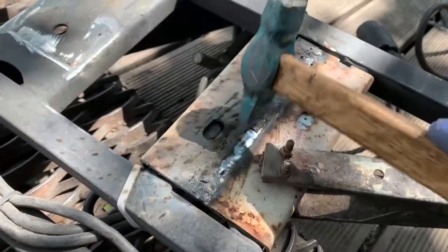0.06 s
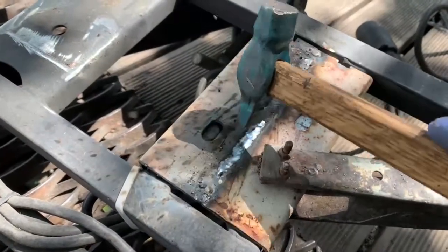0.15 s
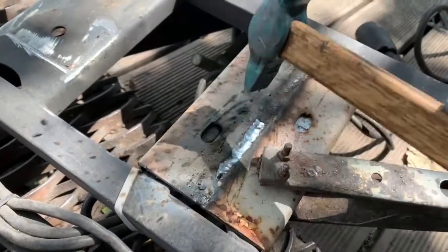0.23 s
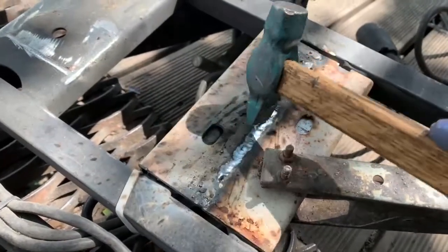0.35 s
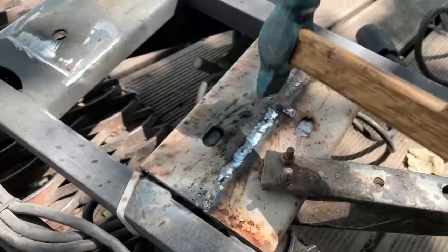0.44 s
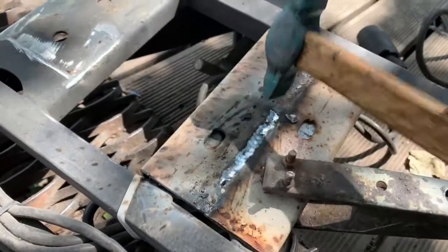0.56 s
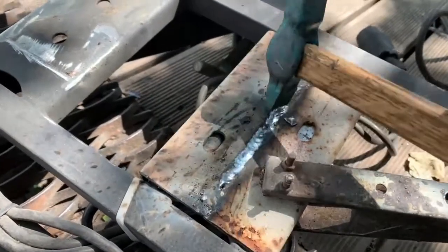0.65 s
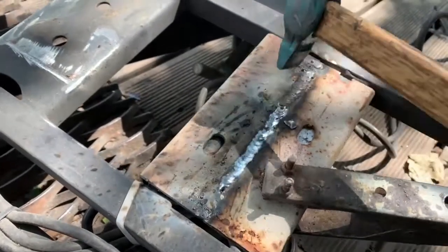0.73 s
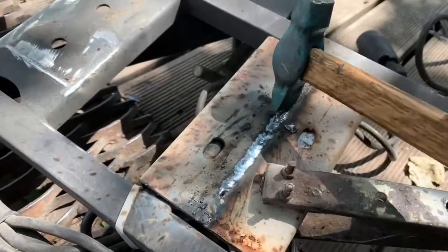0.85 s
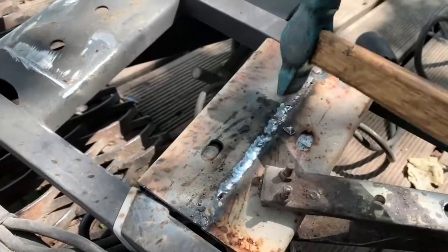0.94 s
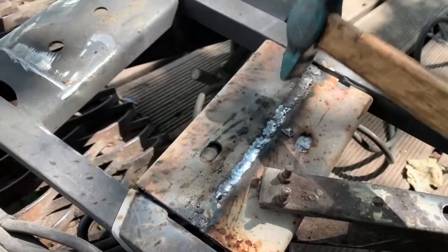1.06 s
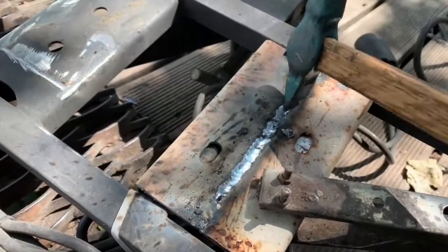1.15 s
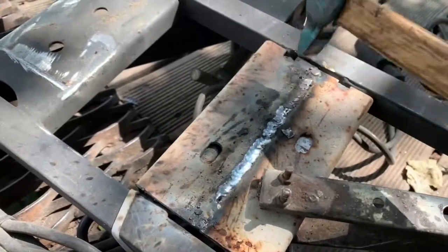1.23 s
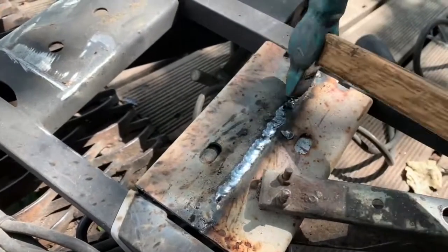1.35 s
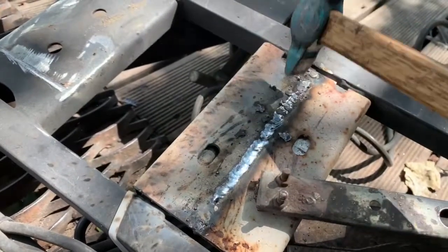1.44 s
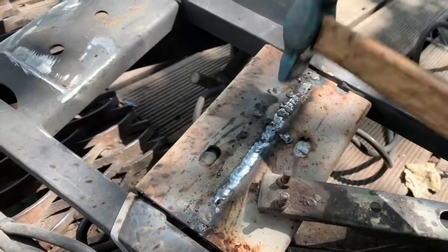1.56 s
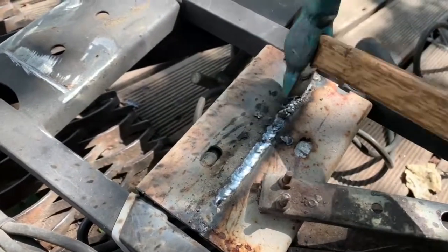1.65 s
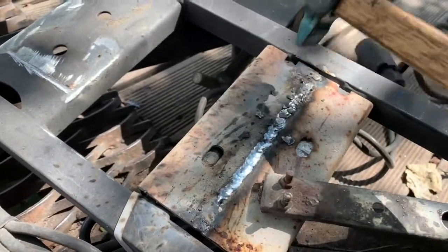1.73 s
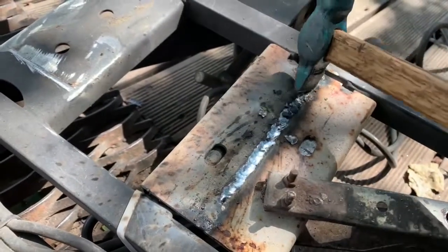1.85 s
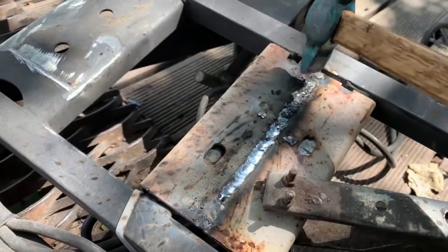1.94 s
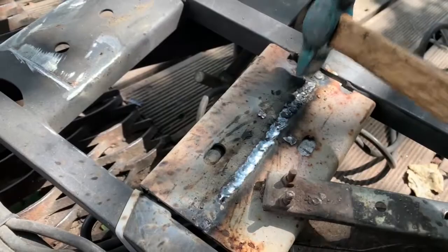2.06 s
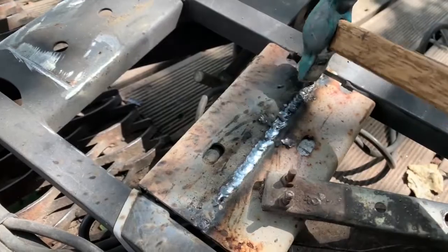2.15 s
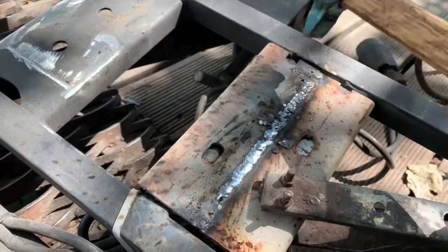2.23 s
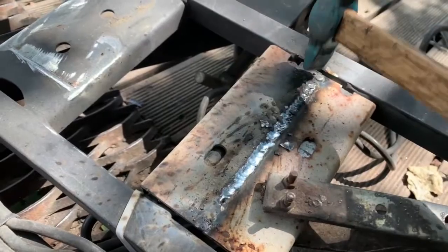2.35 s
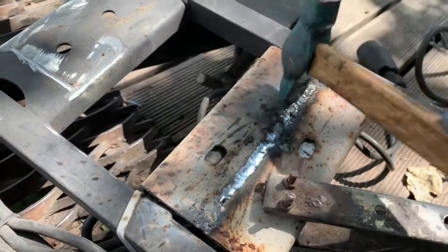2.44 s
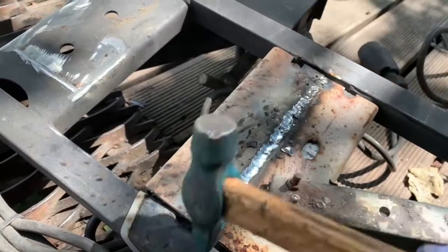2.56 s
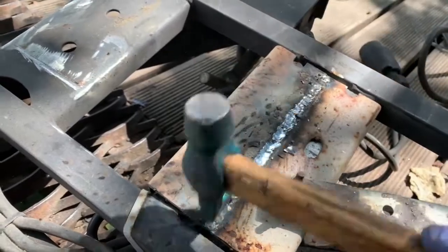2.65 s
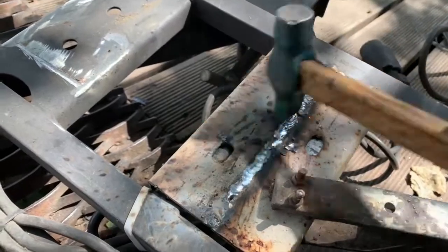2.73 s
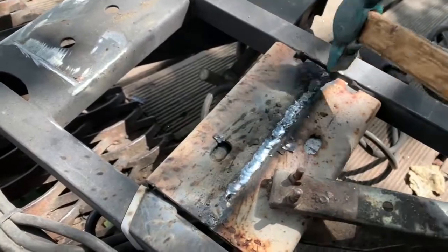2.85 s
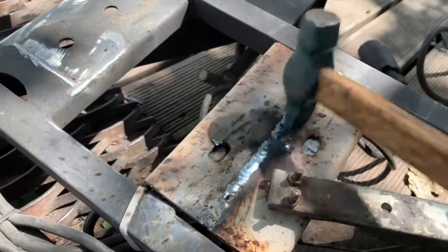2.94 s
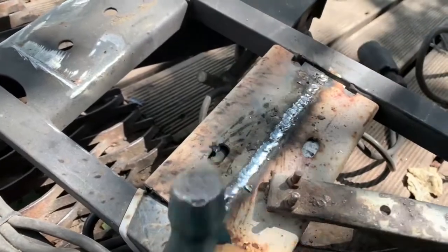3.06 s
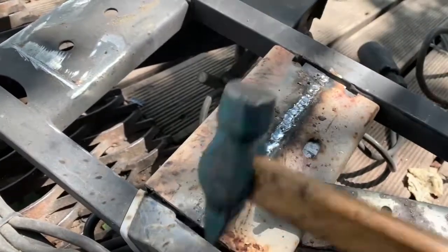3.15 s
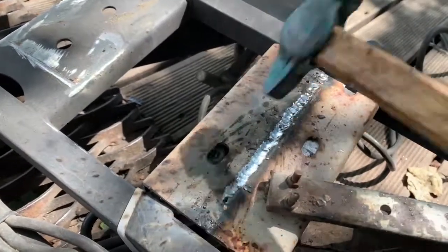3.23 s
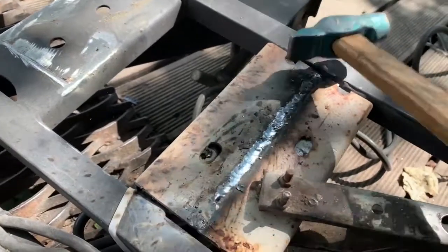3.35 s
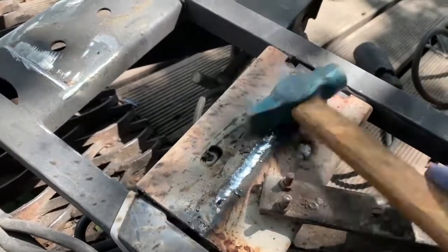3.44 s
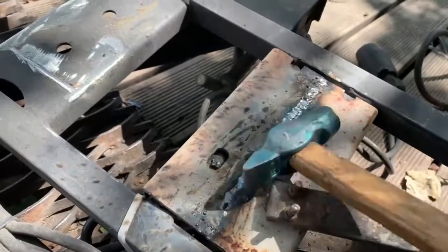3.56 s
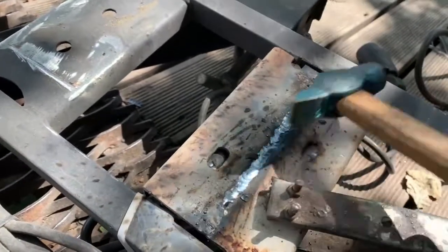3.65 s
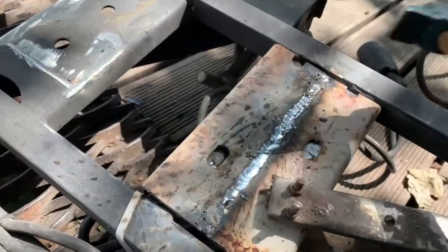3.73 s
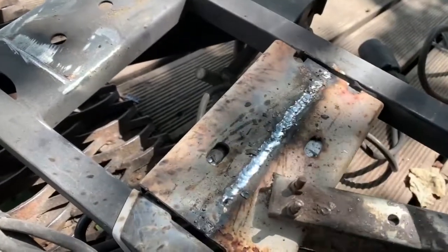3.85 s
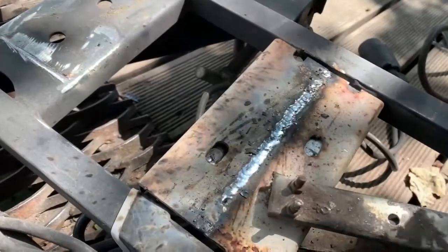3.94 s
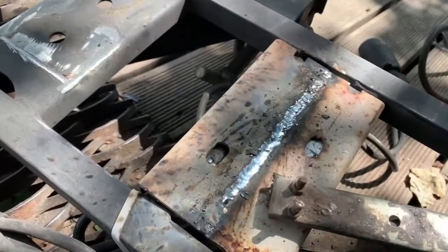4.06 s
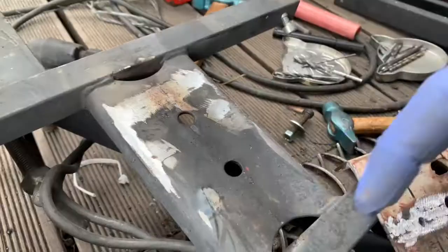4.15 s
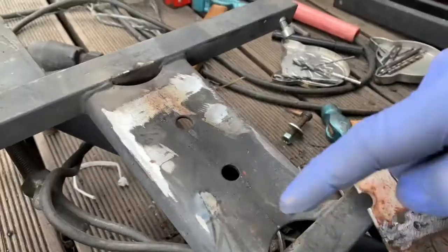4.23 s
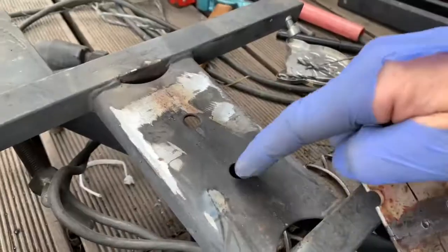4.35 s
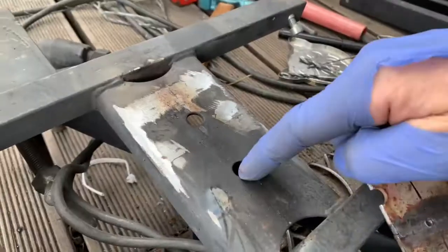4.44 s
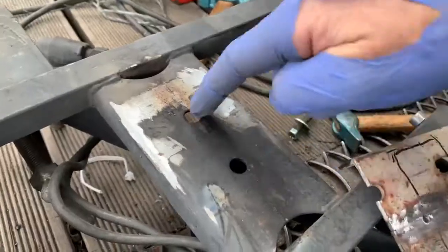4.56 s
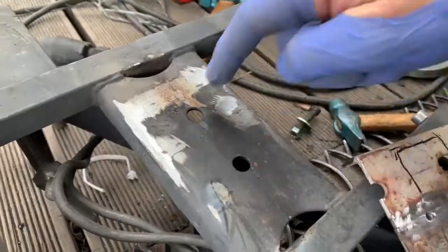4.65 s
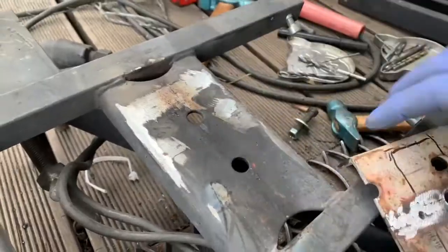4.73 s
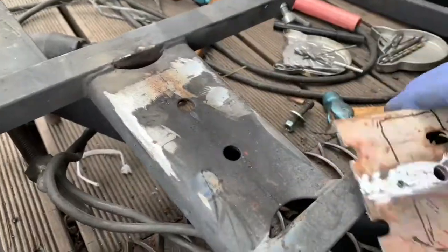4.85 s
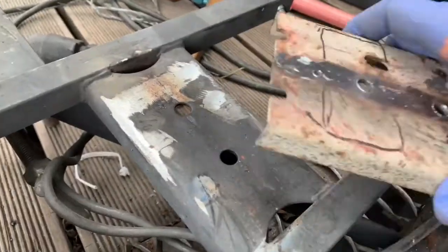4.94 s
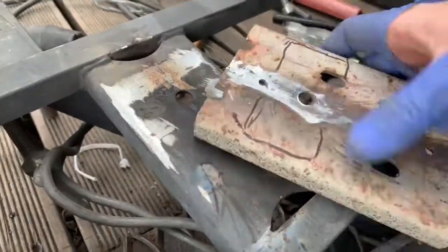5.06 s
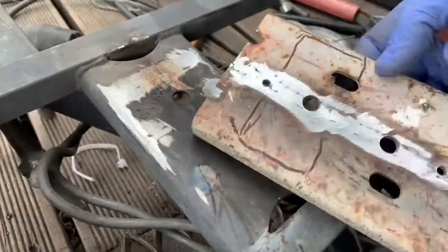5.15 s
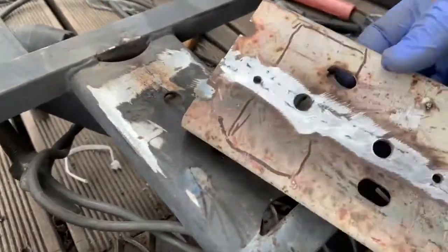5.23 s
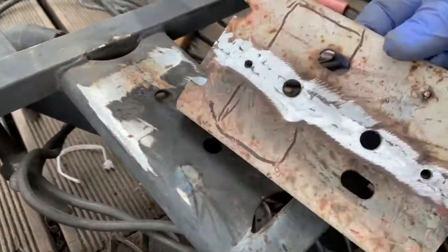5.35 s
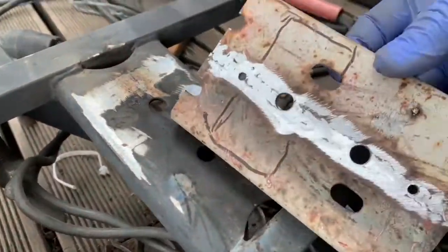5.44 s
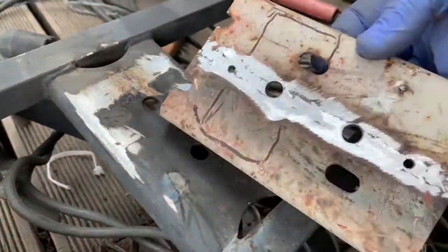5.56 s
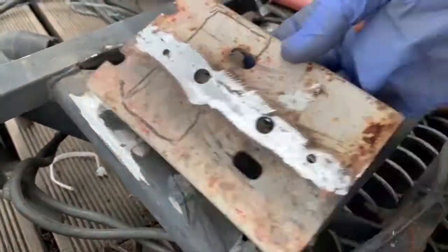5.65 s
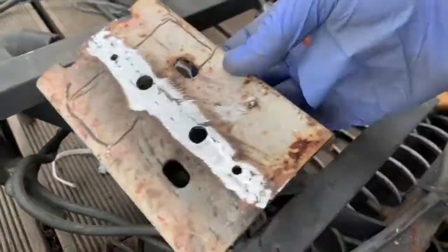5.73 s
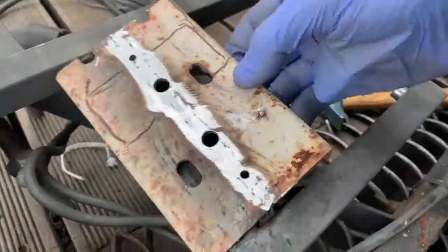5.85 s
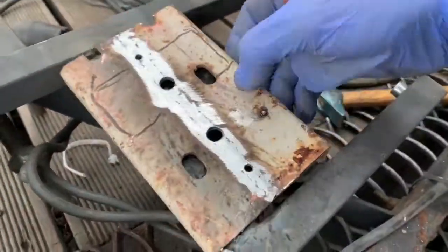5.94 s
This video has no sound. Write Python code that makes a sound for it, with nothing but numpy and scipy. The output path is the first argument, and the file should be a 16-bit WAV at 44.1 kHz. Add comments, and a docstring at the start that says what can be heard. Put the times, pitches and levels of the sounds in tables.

```python
"""An outdoor work yard, with far traffic rumbling. A small hammer chips slag off a weld on a steel plate
clamped to a frame, then rakes along the seam. Each impact crunches the brittle slag, a broadband noise,
and excites the damped normal modes of plate and frame; crumbs patter down. Then the scene changes to
yard noise with thinner bass: a loose plate is lifted and clinks while a distant motor drones nearer."""
import sys
import numpy as np
from scipy import signal
from scipy.fft import rfft, irfft, next_fast_len
from scipy.io import wavfile

SR = 44100
rng = np.random.default_rng(int(sys.argv[2]) if len(sys.argv) > 2 else 0)


def to_wav(sig):
    """Store sig (one row per channel, or 1-D mono) as 16-bit WAV at the path in sys.argv[1].

    Samples outside -1..1 are clipped; the rate is SR.
    """
    pcm = np.clip(np.atleast_2d(sig), -1, 1) * 32767
    pcm = np.round(pcm).astype(np.int16)
    wavfile.write(sys.argv[1], SR, pcm.T)  # frames by channels


N = 264600
TIME = np.arange(N) / SR
BAND_EDGES_HZ = 25 * 2 ** np.arange(0, 9.5, 1 / 3)
SCENE_CHANGE_S = 4.165

# Background noise spectra: frequency_hz, relative_density_db
TRAFFIC_SPECTRUM = [(18, -31.5), (38, -14), (56, 1.5), (91, -5), (467, -18.5), (592, -21), (1180, -23.5),
                    (2220, -31.5), (2530, -30), (3760, -36), (13000, -49), (16500, -75.5)]
YARD_SPECTRUM = [(24, -86), (40, -44), (156, -4.5), (168, 2), (191, -18.5), (228, -36), (285, -2),
                 (406, -15.5), (725, -13.5), (1200, -21.5), (3050, -20), (7940, -36.5), (12800, -42),
                 (16500, -69)]
# Likeness of left and right: frequency_hz, correlation
BACKGROUND_COHERENCE = [(60, 0.95), (180, 0.9), (550, 0.61), (1650, 0.39), (4970, -0.2), (15000, -0.44)]
IMPACT_COHERENCE = [(300, 1), (1000, 1), (1900, 0.24), (5500, 0.4), (9000, 0.73), (14000, 1)]
# Motor resonances: pitch_hz, bandwidth_hz, relative_db
MOTOR_RESONANCES = [(193.1, 3.7, -0.5), (303.6, 58, -2), (682, 77, -9)]
# Soft finger taps: start_s, level_db
TAPS = [(4.409, -50), (4.466, -48)]
# Loose plate touching steel, with tone offsets: start_s, level_db, boom_db, knock_db, treble_db
CLINKS = [(5.009, -16, -9.5, -6, 2), (5.0593, -24.5, -6, -9, 0.5), (5.0968, -35.5, -5, 2, -6),
          (5.1043, -34, -0.5, -5, -10), (5.6785, -37.5, -5, -15, -10), (5.7712, -55.5, 11, 19, 11),
          (5.95, -44, 6.5, 7.5, 4)]
# Hammer blows, with tone offsets: start_s, level_db, boom_db, knock_db, treble_db, frame_ring_db
BLOWS = [(0.0923, -15, 6, 5, -5, -49), (0.3473, -21.5, 9, 1.5, 8.5, -37), (0.598, -9.5, 2, 0, -1, -37.5),
         (0.853, -14.5, 4, -0.5, 2, -40.5), (1.1098, -11, 3, -1, -1.5, -35),
         (1.3437, -7.5, 3, 4, 3.5, -38.5), (1.5999, -4, -0.5, 5, 0.5, -52),
         (1.8552, -8.5, -0.5, 5, -1, -42), (2.0895, -4, 0, 3.5, -0.5, -36),
         (2.3857, -10.5, 2.5, 3.1, 2.5, -48), (2.4285, -20, 6.5, 0.5, -19, -56),
         (2.4482, -29, 3, -5, 2.5, -54), (2.487, -27.5, -29, -29, 2, -52), (2.499, -29, 3, -24, 9, -38),
         (2.5372, -13, -2.5, 2.2, -6, -63), (2.584, -21, 10, 2.2, -9, -42),
         (2.7636, -22.5, 6, 2.5, 1.2, -53.5), (2.814, -15.5, -9.5, -3.5, -4.4, -33.5),
         (2.9205, -18.5, -0.1, 2, -24, -52), (3.029, -29, 11, 4.5, 6, -58),
         (3.4163, -5, -6.5, -1.5, -4.5, -33.5), (3.5159, -35, 13, 13, 4, -55),
         (3.5474, -21, 0, -11, -10.5, -30.5)]
# Where the tone offsets apply (the body's is zero): boom_hz, knock_hz, body_hz, treble_hz
CLINK_TONE_HZ = [900, 2200, 4500, 9500]
BLOW_TONE_HZ = [400, 1050, 3500, 9500]
# Impact noise spectra: frequency_hz, relative_density_db
CLINK_SPECTRUM = [(180, -47), (300, -48), (1290, -7.5), (2930, -5), (4240, -12.5), (4930, -41), (5360, 11),
                  (5830, -11.5), (14200, -18.5), (16500, -36)]
CRUNCH_SPECTRUM = [(59, -39), (100, -18), (410, -22), (589, -15), (811, -28), (983, -4.5), (1270, -12),
                   (1510, -14.5), (2460, -11), (4680, -8.5), (5430, -12), (10100, -16), (11700, -21.5),
                   (13600, -18), (16500, -49.5)]
# Decay of impact noise, before decay_scale: frequency_hz, crack_t60_s, clatter_t60_s
IMPACT_DECAY = [(148.9, 0.084, 0.53), (960, 0.015, 0.18), (4000, 0.022, 0.16), (9200, 0.032, 0.18),
                (15600, 0.022, 0.1)]
# Normal modes of the plates: pitch_hz, relative_db, t60_s
LOOSE_MODES = [(417, -2, 0.031), (946, -7, 0.075), (1810, -16, 0.093), (2330, -0.5, 0.042),
               (3060, -11, 0.057), (3470, -1.5, 0.035), (3730, -11, 0.011), (5006, -9, 0.12),
               (5800, 5, 0.03), (6029, -17, 0.18), (6340, -18, 0.034), (8640, -7, 0.017), (8700, -11, 0.1)]
CLAMPED_MODES = [(592, -13.5, 0.08), (1004.8, -1, 0.09), (1029, -13, 0.17), (951.6, -2, 0.051),
                 (1082, -4.5, 0.082), (1537, -10, 0.063), (2006, -8, 0.044), (2113, -23, 0.22),
                 (2360, -7.5, 0.02), (2840, -9, 0.19), (3229, 3, 0.035), (3450, -7.5, 0.07),
                 (4100, -2, 0.06), (4230, -6.5, 0.099), (4280, -15, 0.16), (4500, -29, 0.41),
                 (4444, -6.5, 0.017), (5910, -8, 0.067), (5980, -9, 0.13), (6570, -3.5, 0.086),
                 (6670, -15, .1), (6650, -10.5, 0.068), (8050, -15, 0.09), (9862, -18, 0.039)]
# Hammer edge dragged over the seam: start_s, fade_from_s, end_s, level_db
# The strokes swell and ease off; the third starts abruptly and only fades.
RAKE_STROKES = [(2.44, 2.49, 2.525, -15), (2.927, 2.978, 3.008, -23), (3.449, 3.435, 3.478, -12.5),
                (3.467, 3.469, 3.53, -19.5)]
# Spectrum of raking relative to blows: frequency_hz, gain_db
RAKE_COLOUR = [(300, -14), (1000, -5.5), (2200, 0), (4000, -0.5), (6000, 0), (12000, 7)]
# Short treble ticks, the dying patter of an earlier blow and then single flakes landing: start_s, level_db
SLAG_TICKS = [(0.002, -52.5), (0.0588, -52), (0.183, -61.5), (0.204, -63), (0.278, -72), (0.3134, -55.5),
              (0.74, -71.5), (0.817, -75), (0.98, -69), (1.0417, -66.5), (3.224, -66.5)]
# Phase difference between the channels: frequency_hz, left_lead_rad
CLINK_PHASE = [(0, -2), (2400, 0.8), (3000, 5), (4100, -2), (5500, -2.5), (6500, 2.3), (16200, -3.5)]
HAMMER_PHASE = [(0, 0), (690, 0.85), (1030, 1.18), (1400, 1.32), (1720, -0.7), (3270, -3), (4220, -6),
                (5430, -10.5), (6720, -11.5), (7670, -15), (8700, -16), (13700, -26), (16200, -35)]
# Level difference between the channels: frequency_hz, left_over_right_db
CLINK_BALANCE = [(60, -3), (180, -2.0), (550, 1.5), (1650, -5.5), (4970, 3.0), (15000, 3)]
HAMMER_BALANCE = [(60, -6), (130, -0.5), (290, 0.5), (640, 2), (1410, 3.5), (3100, 3), (6820, -1),
                  (15000, 1.5)]


def amp(db):
    """Amplitude grows tenfold for every 20 dB."""
    return 10 ** (np.asarray(db) / 20)


def unit_rms(x):
    """Normalisation to unit mean power."""
    return x / np.sqrt(np.mean(x ** 2) + 1e-20)


def at_hz(table, hz, column=1):
    """Interpolation on a logarithmic frequency axis."""
    table = np.array(table)
    return np.interp(np.log(hz), np.log(table[:, 0] + 1), table[:, column])


def high_pass(x, hz, order=2):
    """A high-pass filter attenuates the bass."""
    return signal.sosfilt(signal.butter(order, hz, "high", fs=SR, output="sos"), x)


def impulses(events, gains):
    """A brief contact acts as an impulse: one at each event's start."""
    out = np.full(N, 1e-18)
    out[(np.array(events)[:, 0] * SR).astype(int)] = gains
    return out


def decay(hits, t60):
    """Exponential decay: each impulse falls 60 dB in t60 seconds."""
    return signal.lfilter([1], [1, -amp(-60 / (t60 * SR))], hits)


def ring(force, hz, t60):
    """Damped oscillator: a unit impulse starts a decaying sine of height 1."""
    radius, angle = amp(-60 / (t60 * SR)), 2 * np.pi * hz / SR
    return signal.lfilter([0, np.sin(angle)], [1, -2 * radius * np.cos(angle), radius ** 2], force)


def grit(per_s, spread_db, t60):
    """Shot noise: tiny random contacts sum to an uneven envelope of unit rms."""
    sizes = amp(spread_db * np.minimum(rng.exponential(1, N), 4))
    contacts = rng.random(N) < per_s / SR
    return unit_rms(decay(sizes * contacts + 1e-18, t60))


def drift(rate_hz):
    """Low-passed noise fluctuates slowly, with unit rms."""
    step = 40
    pole = np.exp(-2 * np.pi * rate_hz * step / SR)
    slow = signal.lfilter([1], [1, -2 * pole, pole ** 2], rng.standard_normal(N // step + 2002))[2000:]
    return np.interp(np.arange(N) / step, np.arange(len(slow)), unit_rms(slow))


def noise_bands(coherence, lowest_hz=20):
    """Partial coherence: in-phase and antiphase noise mix to stereo in each third-octave band."""
    whites = rng.standard_normal((2, 2, N))   # neighbouring bands use independent noise
    edges = BAND_EDGES_HZ[BAND_EDGES_HZ > lowest_hz]
    for k, (low, high) in enumerate(zip(edges, edges[1:])):
        band = signal.butter(2, [low, high], "band", fs=SR, output="sos")
        mid, side = signal.sosfilt(band, whites[k % 2])
        hz = np.sqrt(low * high)
        alike = at_hz(coherence, hz)
        yield hz, np.sqrt(.5 + alike / 2) * mid + np.sqrt(.5 - alike / 2) * side * [[1], [-1]]


def ambient_noise(spectrum):
    """Random amplitude modulation makes each band of a broad noise gently patchy."""
    return sum(amp(at_hz(spectrum, hz) + 1.1 * drift(rate_hz=24)) * noise
               for hz, noise in noise_bands(BACKGROUND_COHERENCE))


def ramp(start_s, db, db_per_s):
    """Exponential gain: from its onset the level changes linearly in decibels."""
    return amp(db + db_per_s * (TIME - start_s)) * (TIME >= start_s)


def traffic(level_db=-55, fade_from_s=3.58, fade_db_per_s=5):
    """Far traffic is broadband noise with its power in the bass; it thins as the first scene ends."""
    gain = amp(level_db - fade_db_per_s * np.maximum(TIME - fade_from_s, 0)) * (TIME < SCENE_CHANGE_S)
    return gain * unit_rms(ambient_noise(TRAFFIC_SPECTRUM))


def yard():
    """The second scene's ambient noise, high-passed to a thinner bass, swells slowly."""
    noise = unit_rms(high_pass(ambient_noise(YARD_SPECTRUM), 75, order=4))
    return ramp(SCENE_CHANGE_S, db=-64.5, db_per_s=2) * noise


def resonant_noise(hz, width_hz):
    """A resonator driven by noise gives a wavering tone."""
    radius = np.exp(-np.pi * width_hz / SR)
    feedback = [1, -2 * radius * np.cos(2 * np.pi * hz / SR), radius ** 2]
    return unit_rms(signal.lfilter([1, 0, -1], feedback, rng.standard_normal(N)))


def motor(whine_end_s=4.6):
    """Narrow resonances drone and swell as the motor nears; a brief faint whine comes first."""
    drone = sum(amp(db) * resonant_noise(hz, width_hz) for hz, width_hz, db in MOTOR_RESONANCES)
    drone *= ramp(start_s=4.45, db=-72.5, db_per_s=9.5)
    whine = resonant_noise(hz=431, width_hz=6.02) * (TIME < whine_end_s)
    whine *= ramp(SCENE_CHANGE_S, db=-69, db_per_s=-15.5)
    return high_pass(drone + whine, 80, order=4)


def localise(x, phase, balance, scatter_db=-24.5, scatter_t60_s=0.041):
    """Phase and level differences place a near source; frame and deck add scattered reflections."""
    size = next_fast_len(N + 8192)
    hz = np.arange(size // 2 + 1) * SR / size
    left = np.exp(.5j * np.interp(hz, *np.transpose(phase))) * amp(at_hz(balance, hz + 1) / 2)
    direct = np.array([left, 1 / left])
    tail = amp(scatter_db - 60 * np.arange(4096) / (scatter_t60_s * SR))
    band = signal.butter(2, [1300, 6940], "band", fs=SR, output="sos")
    scatter = signal.sosfilt(band, tail * rng.standard_normal((2, 4096)))
    return irfft(rfft(x, size) * (direct + rfft(scatter, size)), size)[:, :N]


def impact_db(events, tone_hz, hz, spread_db):
    """Excitation spectrum: each impact's level at one frequency, with its tone offset and chance."""
    level_db, boom, knock, treble = np.transpose(events)[1:5]
    tones = np.transpose([boom, knock, np.zeros(len(events)), treble])
    offset_db = [np.interp(np.log(hz), np.log(tone_hz), tone) for tone in tones]
    return level_db + offset_db + rng.normal(0, spread_db, len(events))


def impact_noise(events, tone_hz, spectrum, crack_db, clatter_db, decay_scale=1, rubbing=0):
    """Frequency-dependent decay: a crack and a broken clatter die by band; rubbing sustains the noise."""
    out = np.zeros((2, N))
    bounces = 1.02 + 0.46 * grit(per_s=190, spread_db=1.3, t60=0.1)
    for hz, noise in noise_bands(IMPACT_COHERENCE, lowest_hz=tone_hz[0] / 6):
        hits = impulses(events, amp(impact_db(events, tone_hz, hz, spread_db=1.5)))
        crack = amp(crack_db) * decay(hits, decay_scale * at_hz(IMPACT_DECAY, hz))
        clatter = amp(clatter_db) * decay(hits, decay_scale * at_hz(IMPACT_DECAY, hz, column=2))
        rise = np.exp(-1 / ((0.0003 + 1.2 / hz) * SR))   # lows build up later
        envelope = signal.lfilter([1 - rise], [1, -rise], crack + clatter * bounces)
        envelope += amp(at_hz(RAKE_COLOUR, hz)) * rubbing
        out += amp(at_hz(spectrum, hz)) * envelope * noise
    return out


def plate_ring(events, tone_hz, modes, ring_db, rubbing=0):
    """Modal superposition: impacts and friction noise drive each damped mode of a plate."""
    out = np.zeros(N)
    friction = rubbing * rng.standard_normal(N)
    for hz, mode_db, t60 in modes:
        strengths = amp(impact_db(events, tone_hz, hz, spread_db=3.5) + ring_db)
        force = impulses(events, strengths * rng.choice([-1, 1], len(events)))
        force += amp(at_hz(RAKE_COLOUR, hz) - 43) * friction
        out += ring(amp(mode_db) * force, hz, t60)
    return high_pass(out, 360)


def finger_taps():
    """A gloved finger excites one low, heavily damped resonance: a dull tap."""
    hits = impulses(TAPS, amp(np.array(TAPS)[:, 1]))
    return high_pass(ring(hits, hz=217, t60=0.066), 100, order=4)


def loose_plate():
    """Hard contact with steel gives a sharp crack and free vibration of the plate: a clink."""
    crack = impact_noise(CLINKS, CLINK_TONE_HZ, CLINK_SPECTRUM, crack_db=5.65, clatter_db=-35)
    ringing = plate_ring(CLINKS, CLINK_TONE_HZ, LOOSE_MODES, ring_db=-16)
    return high_pass(crack + ringing, 240)


def frame_ring():
    """Each blow shakes the frame into free vibration in one lightly damped mode."""
    hits = impulses(BLOWS, amp(np.array(BLOWS)[:, 5]))
    return high_pass(ring(hits, hz=2446, t60=0.25), 1700)


def slag_crumbs():
    """Tiny impacts radiate treble noise: a patter of crumbs after every blow, and short ticks."""
    patter = decay(impulses(BLOWS, amp(-63)), t60=0.44) * grit(per_s=400, spread_db=4, t60=0.039)
    ticks = decay(impulses(SLAG_TICKS, amp(np.array(SLAG_TICKS)[:, 1])), t60=0.13)
    return (patter + ticks) * high_pass(rng.standard_normal(N), 4500)


def rake_envelope(start_db=-12.5, end_db=-4):
    """Sliding friction: the edge stutters over the weld beads, easing off as each stroke ends."""
    pressure = np.zeros(N)
    for start, fade_from, end, db in RAKE_STROKES:
        stroke_db = db + np.interp(TIME, [start, fade_from, end], [start_db, 0, end_db])
        pressure += amp(stroke_db) * (TIME > start) * (TIME < end)
    return pressure * grit(per_s=420, spread_db=3.2, t60=0.014)


def hammer():
    """Brittle fracture: blows and raking crunch the slag and set the clamped plate ringing."""
    rake = rake_envelope()
    crumbs = slag_crumbs()
    crunch = impact_noise(BLOWS, BLOW_TONE_HZ, CRUNCH_SPECTRUM, crack_db=11.32, clatter_db=-6.5,
                          decay_scale=0.78, rubbing=rake)
    ringing = plate_ring(BLOWS, BLOW_TONE_HZ, CLAMPED_MODES, ring_db=-17.5, rubbing=rake)
    return high_pass(crunch + ringing, 90) + frame_ring() + crumbs


def scene():
    """Superposition: the background and the near sources add in each channel."""
    chipping = localise(hammer(), HAMMER_PHASE, HAMMER_BALANCE)
    handling = localise(loose_plate() + finger_taps(), CLINK_PHASE, CLINK_BALANCE)
    return traffic() + yard() + motor() + handling + chipping


def record(dry):
    """Soft saturation rounds the peaks; a steep low-pass removes the highest treble."""
    rounded = .95 * np.tanh(dry / .95)
    return signal.sosfilt(signal.cheby2(12, 70, 16500, fs=SR, output="sos"), rounded)


dry = scene()
out = record(dry)
to_wav(out)
```